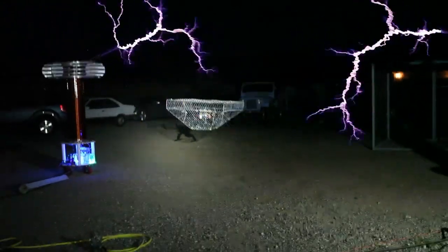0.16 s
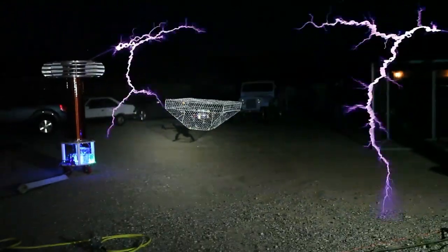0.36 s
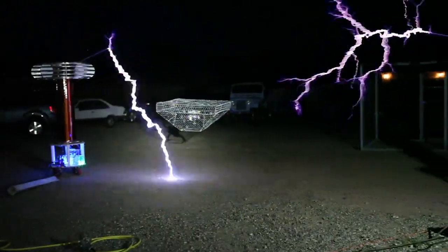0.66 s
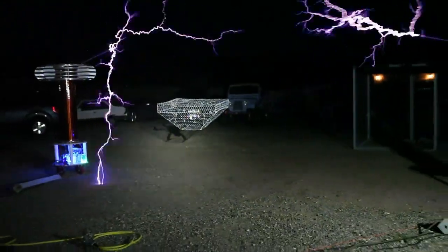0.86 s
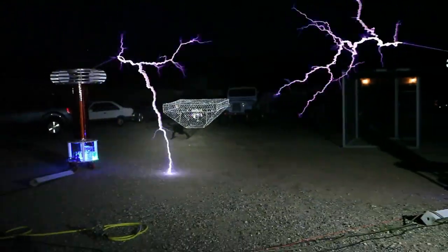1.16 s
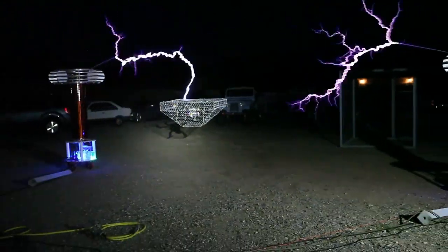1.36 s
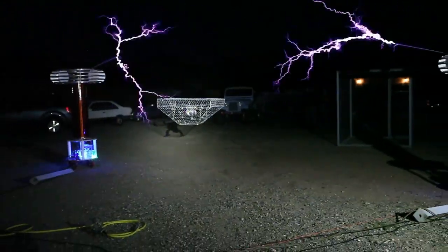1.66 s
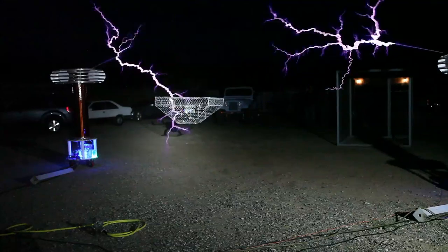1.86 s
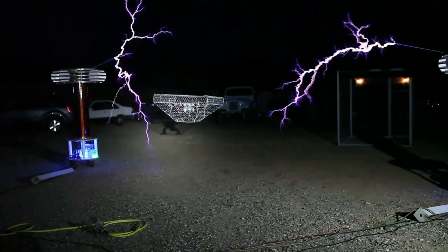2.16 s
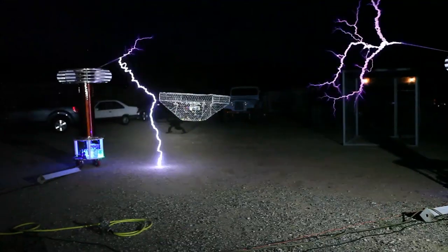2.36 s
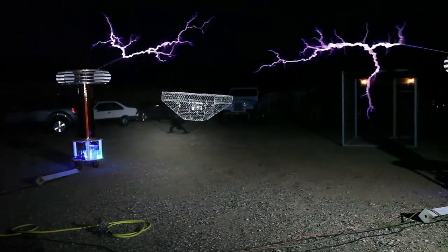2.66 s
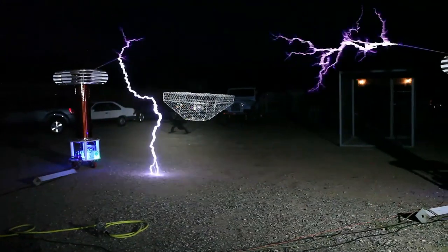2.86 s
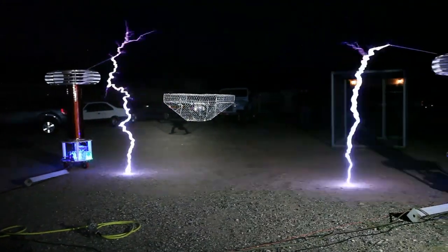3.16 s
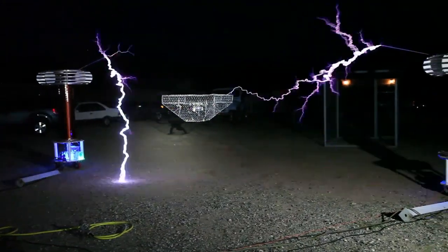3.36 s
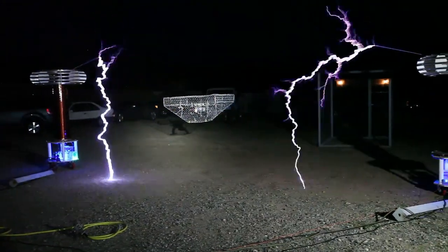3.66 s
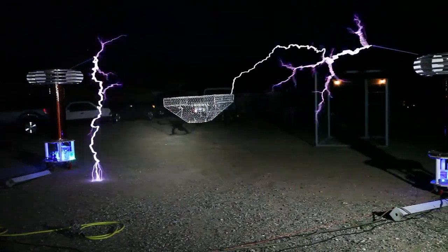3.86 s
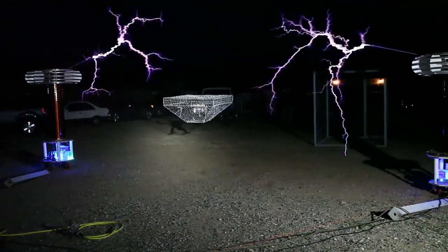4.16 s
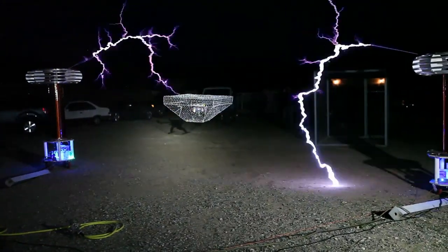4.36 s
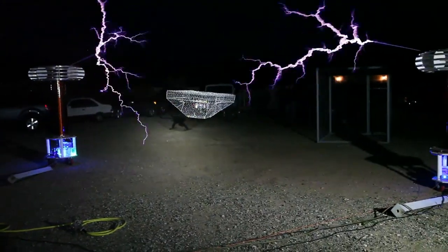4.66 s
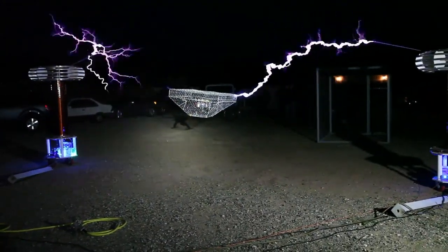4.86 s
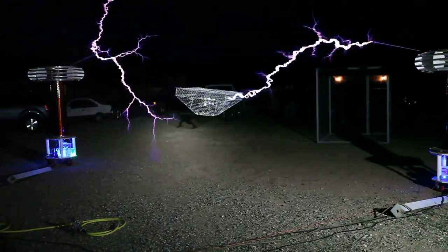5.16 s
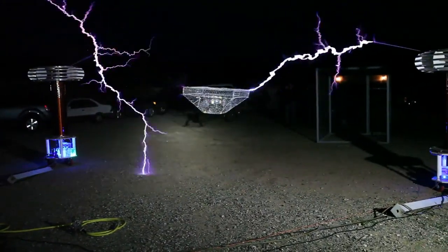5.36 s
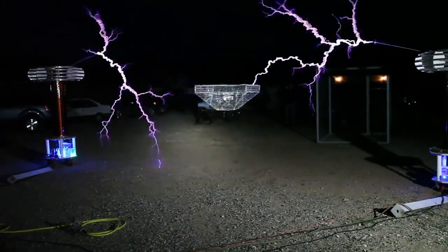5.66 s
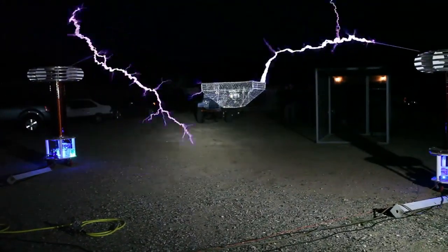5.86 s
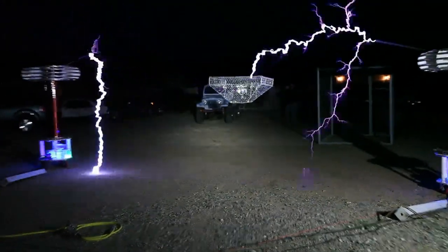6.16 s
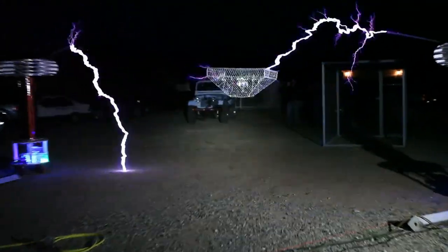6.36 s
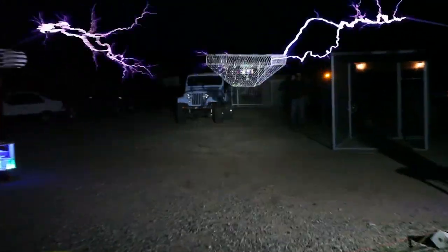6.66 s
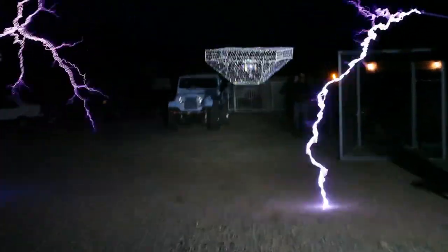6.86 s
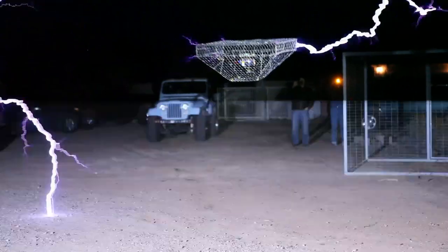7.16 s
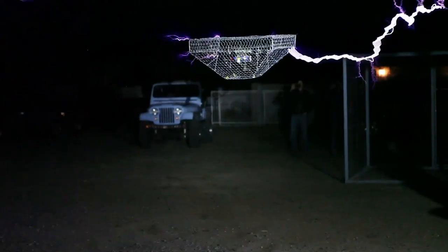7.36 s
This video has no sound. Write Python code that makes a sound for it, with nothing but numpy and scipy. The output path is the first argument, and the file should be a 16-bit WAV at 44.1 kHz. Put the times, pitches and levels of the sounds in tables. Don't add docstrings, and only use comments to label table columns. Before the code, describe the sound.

Continuous raspy high-voltage buzzing from two coils outdoors, bursting into hard, bright zaps on the gravel and a wire cage, a small drone whirring faintly beneath.

```python
import sys
import numpy as np
from scipy import signal
from scipy.fft import rfft, irfft, next_fast_len
from scipy.io import wavfile
from scipy.ndimage import uniform_filter1d, minimum_filter1d, map_coordinates

SR = 44100
rng = np.random.default_rng(int(sys.argv[2]) if len(sys.argv) > 2 else 0)


def volts_from_decibels(level):
    exponent = np.asarray(level, float) / 20
    return 10 ** exponent


def generate_wav(sig):
    pcm = np.round(np.clip(np.atleast_2d(sig).T, -1, 1) * 32767).astype(np.int16)
    wavfile.write(sys.argv[1], SR, pcm)


N = 331632

# time in seconds, firing rate in Hz.
LEFT_RATE_HZ = [(0, 198.2), (0.6, 197.8), (0.9, 196), (1.22, 191.7), (1.43, 191.8), (1.6, 198.3),
                (1.92, 203), (2.05, 205.1), (3.17, 205.3), (3.3, 200.8), (3.5, 199), (4.07, 199),
                (4.45, 217), (4.9, 221), (5.05, 222.7), (5.43, 222.9), (5.52, 218.4), (7.52, 218.9)]
RIGHT_RATE_HZ = [(0, 252), (2.55, 252.1), (2.68, 250.8), (2.95, 250.8), (3.07, 240.6), (4.3, 241),
                 (5.6, 240.9), (7.52, 240)]
# time in seconds, level in dB.
STREAMER_DB = [(0.0, -23), (0.27, -24), (0.92, -22.5), (1.03, -24.5), (1.7, -24.5), (1.85, -24),
               (2.1, -23.5), (2.35, -25), (2.8, -23.5), (4.3, -24), (5.25, -24), (5.4, -23), (5.5, -25.5),
               (5.6, -22.5), (6.33, -25.5), (7.23, -24), (7.37, -29), (7.52, -23.5)]
# time in seconds, right over left in dB.
LEAN_DB = [(0, 2.5), (.5, -4), (.9, -2), (1.6, -2.5), (1.85, -5), (2.2, -1), (2.6, -2.5), (3.1, -2.5),
           (3.4, 0), (4, -3.5), (4.35, -1), (4.7, -2), (5.1, 1.5), (5.5, 1), (6.1, -3.5), (6.6, 0.5),
           (7.1, -2), (7.52, -6)]
# start in seconds, end in seconds, treble level in dB.
LEFT_STRIKES = [(0, 0.024, -29.5), (0.116, 0.175, -34), (0.28, 0.29, -38), (0.415, 0.45, -37.5),
                (0.562, 0.599, -31.5), (0.666, 0.772, -30), (0.917, 1.111, -31), (1.197, 1.34, -35.5),
                (1.72, 1.76, -52), (1.827, 1.85, -39), (2.002, 2.037, -34), (2.04, 2.187, -38.5),
                (2.31, 2.446, -34), (2.501, 2.647, -31.5), (2.876, 2.974, -36), (3.075, 3.196, -34),
                (3.304, 3.435, -31.5), (3.46, 3.71, -45), (3.735, 3.805, -26.5), (3.83, 3.935, -29),
                (4.237, 4.38, -37.5), (4.797, 4.925, -36), (5.407, 5.49, -34.5), (5.613, 5.69, -31.5),
                (5.947, 6.018, -33), (6.034, 6.125, -31), (6.145, 6.25, -32), (6.363, 6.479, -33.5),
                (6.493, 6.54, -36), (6.562, 6.653, -29.5), (7.067, 7.124, -30), (7.22, 7.258, -32.5),
                (7.317, 7.37, -31), (7.48, 7.54, -33)]
RIGHT_STRIKES = [(0.332, 0.355, -32), (0.83, 0.844, -37), (1.42, 1.523, -35.5), (1.605, 1.635, -39),
                 (1.938, 1.945, -30), (2.137, 2.174, -30), (2.223, 2.256, -37.5), (2.306, 2.388, -34.5),
                 (3.197, 3.293, -32.5), (3.303, 3.493, -35), (3.506, 3.619, -31), (3.623, 3.73, -31.5),
                 (3.968, 4.083, -46), (4.113, 4.15, -35), (4.271, 4.457, -29), (4.512, 4.637, -41),
                 (4.684, 4.723, -42), (4.873, 4.9, -29), (4.96, 4.993, -39), (5.046, 5.12, -54),
                 (5.146, 5.263, -38.5), (5.326, 5.375, -34), (5.747, 5.763, -31), (5.814, 5.867, -33.5),
                 (6.268, 6.367, -29), (6.67, 6.865, -40), (6.893, 6.962, -31.5), (6.98, 7.04, -46),
                 (7.127, 7.2, -50), (7.39, 7.45, -64)]
# time in seconds, treble level in dB.
GRAZE_DB = [
    (0, -43.5),
    (2.8, -45.5),
    (5.5, -44),
    (7.52, -41),
]
# start in seconds, end in seconds, thud in dB, rasp in dB.
RIGHT_ROOT = [(0, 0.3, -36.5, -51), (.33, .52, -46, -54), (.55, .85, -36, -39), (.87, 1.28, -35, -60),
              (1.33, 2.1, -41, -52), (2.22, 2.44, -35, -51), (2.52, 2.64, -40.5, -52),
              (2.95, 3.18, -40.5, -45), (3.3, 3.6, -35.5, -40), (3.65, 3.92, -38, -32),
              (4.0, 4.15, -42.5, -28), (4.23, 4.6, -38, -31), (4.63, 5.15, -41, -32),
              (5.2, 5.3, -39.5, -31), (5.33, 5.52, -35, -38), (5.53, 5.78, -37.5, -31),
              (5.9, 6.0, -34.5, -29), (6.05, 6.21, -35, -25), (6.25, 6.34, -37.5, -38),
              (6.4, 6.6, -40.5, -47), (6.63, 6.87, -38, -30), (6.93, 7.17, -48, -32),
              (7.22, 7.45, -38, -35)]
# start in seconds, end in seconds, level in dB.
LEFT_ROOT = [
    (.25, .55, -39),
    (1.75, 2.0, -42),
    (2.2, 2.45, -38),
    (2.7, 2.95, -48.5),
    (4.5, 4.72, -44.5),
    (5.1, 5.45, -41),
    (5.6, 5.85, -44),
    (6.0, 6.4, -41.5),
    (6.6, 6.95, -44),
    (7.05, 7.45, -40.5),
]
# start in seconds, end in seconds, partial number, level in dB.
RIGHT_RIPPLES = [(0.023, 0.19, 4, -31), (0.133, 0.248, 5, -31), (0.31, 0.39, 19, -35), (0.66, 0.75, 8, -32),
                 (0.66, 0.777, 7, -36), (0.72, 0.85, 5, -29.5), (0.89, 1.01, 4, -37), (0.91, 1.04, 8, -34),
                 (1.82, 1.894, 8, -34), (3.068, 3.157, 6, -34), (3.08, 3.16, 11, -34),
                 (3.32, 3.577, 6, -30.5), (3.334, 3.406, 12, -28), (3.33, 3.43, 7, -33),
                 (4.03, 4.14, 5, -31), (4.202, 4.285, 13, -30), (4.21, 4.49, 6, -27), (4.23, 4.48, 11, -35),
                 (4.28, 4.478, 4, -31.5), (4.29, 4.41, 8, -33), (4.844, 4.95, 10, -40),
                 (4.867, 5.006, 7, -33), (5.07, 5.15, 12, -26), (5.144, 5.256, 4, -32),
                 (5.19, 5.43, 7, -36.5), (5.303, 5.42, 9, -32), (5.34, 5.43, 19, -43),
                 (5.35, 5.436, 6, -28), (5.363, 5.505, 4, -32.5), (5.527, 5.77, 6, -28.5),
                 (5.623, 5.734, 9, -33), (5.63, 5.76, 7, -37), (5.644, 5.72, 12, -30),
                 (5.8, 6.15, 7, -30.5), (5.912, 6.205, 5, -32.5), (6.04, 6.197, 4, -36),
                 (6.08, 6.277, 11, -36), (6.21, 6.3, 20, -40), (6.49, 6.65, 6, -33), (6.73, 6.848, 4, -35),
                 (6.95, 7.14, 6, -30)]
LEFT_RIPPLES = [(0.62, 0.75, 9, -34), (1.77, 1.88, 7, -38), (1.812, 1.895, 10, -34), (1.84, 1.92, 5, -33),
                (2.21, 2.31, 14, -42), (2.3, 2.38, 22, -37), (2.31, 2.41, 21, -38), (2.33, 2.41, 18, -29),
                (2.33, 2.43, 20, -36), (2.34, 2.43, 19, -39), (2.34, 2.437, 14, -31),
                (2.348, 2.44, 15, -31), (2.49, 2.568, 10, -49), (2.54, 2.62, 15, -38),
                (2.62, 2.72, 21, -34), (3.07, 3.16, 16, -34), (3.066, 3.18, 7, -37), (3.1, 3.18, 15, -37),
                (3.32, 3.41, 12, -41), (4.026, 4.137, 6, -36), (4.5, 4.636, 4, -35), (4.62, 4.7, 10, -37),
                (5.053, 5.148, 9, -34), (5.07, 5.15, 13, -37), (5.19, 5.33, 10, -38),
                (5.28, 5.382, 11, -35), (5.35, 5.45, 14, -32), (5.566, 5.67, 14, -30),
                (5.576, 5.69, 9, -33), (5.59, 5.69, 13, -35), (5.64, 5.72, 19, -43), (5.77, 5.85, 11, -42),
                (6.21, 6.3, 22, -37), (6.435, 6.52, 11, -32), (6.56, 6.642, 11, -34), (6.93, 7.01, 14, -42),
                (6.94, 7.05, 21, -39), (7.03, 7.14, 11, -38), (7.04, 7.144, 10, -31.5),
                (7.19, 7.29, 11, -39)]
# start in seconds, end in seconds, level in dB.
CAGE_LICKS = [(.3, .36, -38), (.67, .74, -52), (2.3, 2.36, -28), (3.42, 3.52, -29), (3.95, 4.02, -26.5),
              (4.38, 4.45, -44), (4.85, 4.92, -41), (5.08, 5.13, -33), (5.3, 5.52, -25),
              (5.58, 5.72, -26.5), (5.78, 5.9, -29), (5.95, 6.03, -41), (6.18, 6.3, -35), (6.55, 6.62, -39),
              (6.78, 6.85, -28), (6.93, 7.03, -27), (7.25, 7.34, -27), (7.42, 7.5, -27)]
# frequency in Hz, level in dB.
STREAMER_TONE = [(60, -106), (150, -14), (230, -11), (330, -19.5), (480, -5.5), (800, -3.5), (1550, -1),
                 (2700, 1), (3500, -2.5), (4500, -1.5), (7600, -3.5), (9300, -15.5), (12500, -17),
                 (15500, -41)]
STRIKE_TONE = [(40, -44), (150, -23), (1000, -18.5), (3500, -13), (5300, -7), (7600, -2.5), (9300, -10.5),
               (15500, -41.5)]
CRACK_TONE = [(40, -24), (130, -10), (300, -40.5), (5000, -39.5), (8500, -1.5), (10000, -1), (12500, -7.5),
              (15500, -12.5)]
THUD_TONE = [(150, -76.5), (350, -11), (490, 19), (750, 4.5), (1000, 12), (1250, 10), (2000, -51.5)]
RASP_TONE = [(700, -55), (1000, -8), (1200, -24), (1450, 5.5), (1700, 2.5), (1950, -12.5), (2650, -1),
             (3000, -5.5), (3600, -32), (4700, 3), (5600, -58)]
HUM_TONE = [(120, -52), (210, -9.5), (320, -17), (430, -1.5), (640, -7.5), (870, -0.5), (1100, -9),
            (1500, -45.5)]
CAGE_TONE = [(3000, -35), (3900, -0.5), (4500, -3), (5000, -0.5), (5900, -34)]
ROTOR_TONE = [(80, -60), (300, -34), (1000, -16), (3000, -5), (7000, 0), (10000, -16), (15500, -38)]
BLADES_HZ = [340, 314.5, 337.4, 340]
# frequency in Hz, 60 dB decay time in seconds.
YARD_T60_S = [(200, 0.52), (2000, 1), (10000, 0.27)]
# frequency in Hz, gain in dB.
CAPSULE_DB = [(15, -36), (30, -18), (60, -6), (120, -1), (250, 0), (15700, 0), (15800, -60)]

LEFT_WAVER, RIGHT_WAVER = 0.0018, 0.0024
FLARE_DB = 0.8
CATCH_S, BREAK_S = 0.02, 0.008
GROWS_DB = 1
SPUTTER_DB, GRAZE_SWING_DB = 1.14, 3
GROUND_S, GROUND_DB = 0.002, -14
CRACK_DB, CRACK_GROWS = 5, 0.39
SETTLE_S, LOOSEN_S = 0.06, 0.045
RIPPLE_RISE_S, RIPPLE_FALL_S = 0.025, 0.016
YARD_DB = -25
KNOT_HZ = 200


def unit(x):
    return x / np.sqrt(np.mean(x ** 2) + 1e-20)


def along(points, hz):
    f, v = np.transpose(points)
    return np.interp(np.log(hz + 1), np.log(f + 1), v)


def curve(points):
    t, v = np.transpose(points)
    return np.interp(np.arange(N) / SR, t, v)


def wobble(rate_hz, count=1):
    t = np.arange(N * KNOT_HZ // SR + 2) / KNOT_HZ
    knots = rng.standard_normal((count, 1000))
    return np.array([map_coordinates(k, [t * rate_hz], mode="wrap") for k in knots])


def slow(rate_hz, count):
    return np.repeat(wobble(rate_hz, count), SR // KNOT_HZ + 1, axis=1)[:, :N]


def spells(rows, rise_s, fall_s, grows_db=0, axis=2):
    t, power = np.arange(N) / SR, np.zeros(N)
    for row in rows:
        start, end = row[:2]
        here = slice(max(round((start - rise_s) * SR), 0), round((end + fall_s) * SR))
        rise = 1 + (t[here] - start) / rise_s
        fall = 1 + (end - t[here]) / fall_s
        edge = np.clip(np.minimum(rise, fall), 0, 1)
        progress = (t[here] - start) / (end - start)
        power[here] += (edge * volts_from_decibels(row[axis] + grows_db * (progress - 2))) ** 2
    return np.sqrt(power)


def coloured(x, tone):
    m = 8192
    cep = irfft(np.log(volts_from_decibels(along(tone, np.fft.rfftfreq(m, 1 / SR))) + 1e-6))
    cep[1:m // 2] *= 2
    cep[m // 2 + 1:] = 0
    return unit(signal.fftconvolve(x, irfft(np.exp(rfft(cep))))[:N])


def patchy(x, depth_db):
    z = signal.stft(x, nperseg=256)[2]
    field = uniform_filter1d(rng.standard_normal(z.shape), size=7, axis=0)
    field = uniform_filter1d(field, size=12, axis=1)
    return unit(signal.istft(z * volts_from_decibels(depth_db * unit(field)), nperseg=256)[1][:N])


def shocks(times_s, sizes):
    at = np.clip(times_s.ravel() * SR, 0, N) + 8
    taps = np.floor(at)[:, None] + np.arange(-3, 5)
    gap = taps - at[:, None]
    kernel = np.sinc(gap) * np.cos(np.pi * gap / 8) ** 2 * sizes.reshape(-1, 1)
    return np.bincount(taps.astype(int).ravel(), kernel.ravel(), N + 32)[8:N + 8]


def firings(rate_hz, waver):
    turns = np.cumsum(curve(rate_hz) * (1 + waver * slow(11, count=1)[0])) / SR
    return np.interp(np.arange(int(turns[-1])), turns, np.arange(N) / SR)


def channel(fire, count, spread_s, life_s, drift_s, jitter_s, scatter_db, flicker_db):
    shape = (len(fire), count)
    pace, start = rng.random((2, count))
    age = fire[:, None] / (life_s * (0.5 + pace)) + start
    life_index = age.astype(int) % len(fire)

    def per_life():
        return np.take_along_axis(rng.standard_normal(shape), life_index, axis=0)

    place = spread_s * per_life()
    size = (0.8 + per_life()) * volts_from_decibels(scatter_db * per_life())
    size = size * np.clip(4 * np.sin(np.pi * (age % 1)), 0, 1)
    sway = drift_s * wobble(8.3, count)[:, (fire * KNOT_HZ).astype(int)].T
    times = fire[:, None] + place + sway + jitter_s * rng.standard_normal(shape)
    size = size / np.linalg.norm(size, axis=1, keepdims=True)
    return shocks(times, size * volts_from_decibels(flicker_db * rng.standard_normal(shape)))


def streamers(fire, offset_db, flare):
    air = channel(fire, count=26, spread_s=0.003, life_s=0.1, drift_s=3e-5, jitter_s=6e-6,
                  scatter_db=7.5, flicker_db=2.5)
    return volts_from_decibels(curve(STREAMER_DB) + offset_db + FLARE_DB * flare) * coloured(air, STREAMER_TONE)


def bolts(fire, strikes, sputter, graze):
    bolt = channel(fire, count=12, spread_s=0.0004497, life_s=0.055, drift_s=7e-5, jitter_s=2.2e-5,
                   scatter_db=3.5, flicker_db=3.5)
    bolt = bolt + volts_from_decibels(GROUND_DB) * np.roll(bolt, round(GROUND_S * SR))
    held = spells(strikes, CATCH_S, BREAK_S, GROWS_DB) * volts_from_decibels(SPUTTER_DB * sputter)
    grip = np.hypot(held, volts_from_decibels(curve(GRAZE_DB) + GRAZE_SWING_DB * graze))
    body = volts_from_decibels(13.5) * grip * patchy(coloured(bolt, STRIKE_TONE), depth_db=2.5)
    edge = volts_from_decibels(CRACK_DB) * grip * (grip / volts_from_decibels(-33)) ** CRACK_GROWS
    return body + edge * patchy(coloured(bolt, CRACK_TONE), depth_db=2.5)


def coil(rate_hz, waver, strikes, air_db):
    fire = firings(rate_hz, waver)
    sputter, graze, flare = slow(22, count=3)
    return streamers(fire, air_db, flare) + bolts(fire, strikes, sputter, graze), fire


def right_root(fire):
    sway, lag, swell = wobble(10, count=3)[:, (fire * KNOT_HZ).astype(int)]
    times = (fire + 3e-5 * sway)[:, None] + np.outer(0.00199 + 5e-5 * lag, [0, 1])
    sizes = volts_from_decibels(1.4 * swell[:, None] + 0.7 * rng.standard_normal(times.shape))
    thud = coloured(shocks(times, sizes * [1, 0.7]), THUD_TONE)
    rasp = coloured(shocks(times, sizes * [1, 0.05]), RASP_TONE)
    thud_gain = volts_from_decibels(2.5) * spells(RIGHT_ROOT, SETTLE_S, LOOSEN_S, axis=2)
    rasp_gain = volts_from_decibels(-8) * spells(RIGHT_ROOT, SETTLE_S, LOOSEN_S, axis=3)
    return thud_gain * thud + rasp_gain * rasp


def drone():
    speed = 1 + 0.032 * slow(2.8, count=4)
    turn = 2 * np.pi * np.cumsum(np.array(BLADES_HZ)[:, None] * speed, axis=1) / SR
    chop = (1 + 0.7 * np.cos(turn)) * rng.standard_normal(turn.shape)
    chop = chop + 0.02 * np.cos(3 * turn)
    return volts_from_decibels(-33) * coloured(chop.sum(0), ROTOR_TONE)


def yard(x):
    hz, t, z = signal.stft(rng.standard_normal(SR // 2), SR, nperseg=256)
    tail = signal.istft(z * volts_from_decibels(-60 * t / along(YARD_T60_S, hz)[:, None]), SR, nperseg=256)[1]
    return signal.fftconvolve(np.pad(x, (700, 0)), tail / np.linalg.norm(tail))[:N]


def ripples(fire, rows):
    turns = np.interp(np.arange(N) / SR, fire, np.arange(len(fire)))
    sung = np.zeros(N)
    for row in rows:
        start, end, partial = row[:3]
        here = slice(max(round((start - 0.1) * SR), 0), round((end + 0.1) * SR))
        gain = spells([row], RIPPLE_RISE_S, RIPPLE_FALL_S, axis=3)[here]
        sung[here] += np.sqrt(2) * gain * np.cos(2 * np.pi * round(partial) * turns[here])
    return sung * volts_from_decibels(-2.5 + 2.5 * slow(18, count=1)[0])


def left_root(fire):
    swell = wobble(10)[0, (fire * KNOT_HZ).astype(int)]
    hum = shocks(fire, volts_from_decibels(1.5 * swell + 0.7 * rng.standard_normal(len(fire))))
    return spells(LEFT_ROOT, SETTLE_S, LOOSEN_S) * coloured(hum, HUM_TONE)


def cage(fire):
    licks = channel(fire, count=7, spread_s=0.001208, life_s=0.07, drift_s=3e-5, jitter_s=1.5e-5,
                    scatter_db=13.5, flicker_db=2.5)
    return spells(CAGE_LICKS, 0.023, 0.011) * coloured(licks, CAGE_TONE)


def scene():
    lean_db = curve(LEAN_DB)
    left, left_fire = coil(LEFT_RATE_HZ, LEFT_WAVER, LEFT_STRIKES, air_db=-3.5 - lean_db / 2)
    right, right_fire = coil(RIGHT_RATE_HZ, RIGHT_WAVER, RIGHT_STRIKES, air_db=-1 + lean_db / 2)
    arcs = left + right + right_root(right_fire) + cage(right_fire) + left_root(left_fire)
    arcs = arcs + ripples(right_fire, RIGHT_RIPPLES) + ripples(left_fire, LEFT_RIPPLES)
    return (arcs + volts_from_decibels(YARD_DB) * yard(arcs) + drone())[None]


def low_pass(x):
    return signal.sosfilt(signal.butter(12, 15750, fs=SR, output="sos"), x)


def record(dry):
    bent = dry + 0.06 * (dry ** 2 - np.mean(dry ** 2))
    needed = np.minimum(1, 0.5 / (np.abs(bent) + 1e-9))
    held = bent * uniform_filter1d(minimum_filter1d(needed, size=15), size=13)
    m = next_fast_len(N + 8192)
    response = volts_from_decibels(along(CAPSULE_DB, np.fft.rfftfreq(m, 1 / SR)))
    heard = irfft(rfft(held - held.mean(), m) * response, m)[:, :N]
    return low_pass(heard)


dry = scene()
out = record(dry)
generate_wav(out)
```